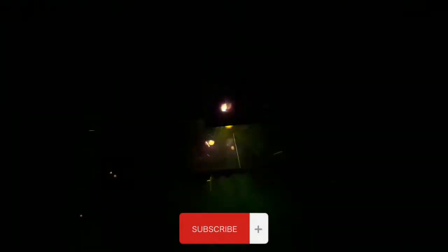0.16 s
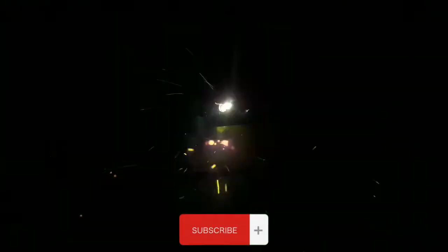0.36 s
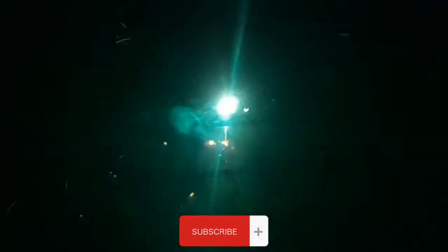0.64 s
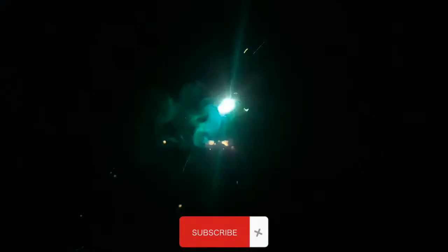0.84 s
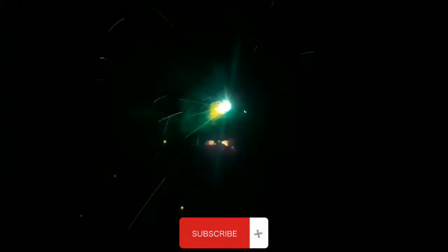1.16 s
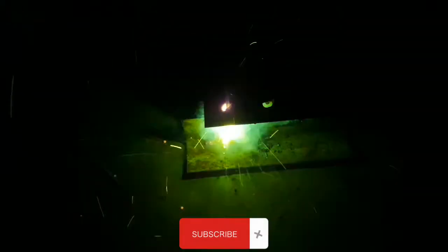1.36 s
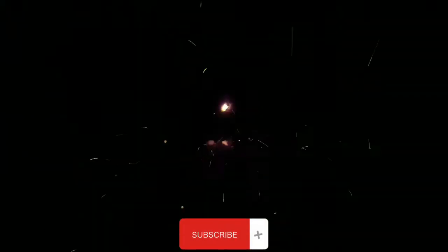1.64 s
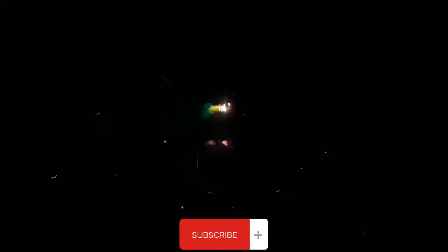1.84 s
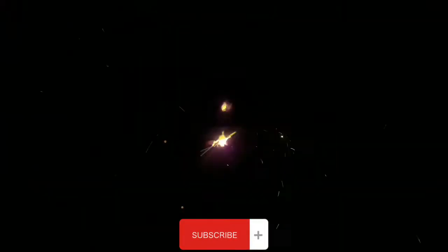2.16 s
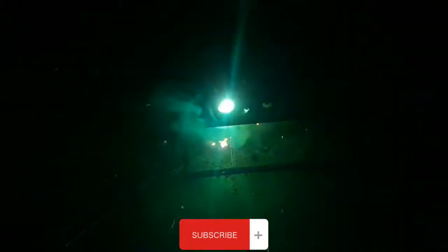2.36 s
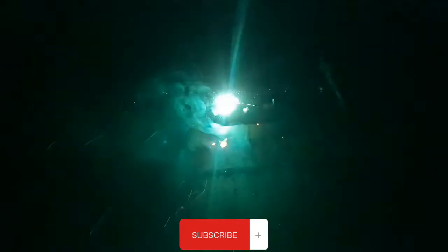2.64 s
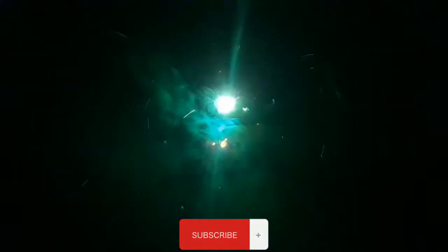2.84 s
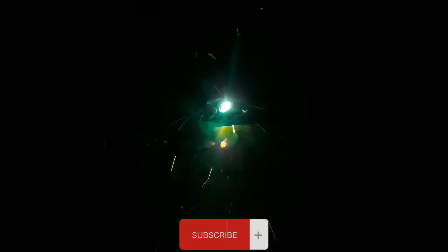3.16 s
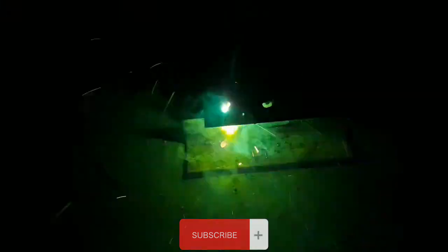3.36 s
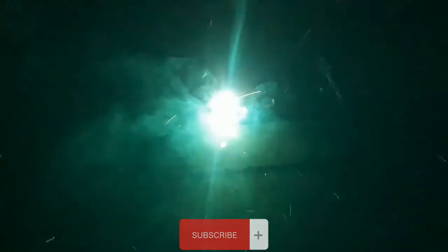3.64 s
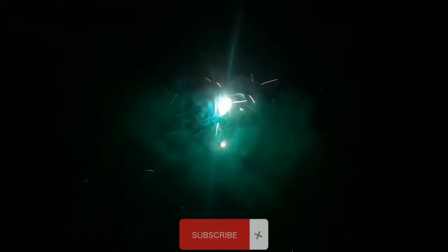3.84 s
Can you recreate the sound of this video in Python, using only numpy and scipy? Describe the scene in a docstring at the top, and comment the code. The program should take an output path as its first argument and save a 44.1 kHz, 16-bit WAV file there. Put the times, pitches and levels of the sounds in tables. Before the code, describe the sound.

An electric welding arc hisses and crackles on steel, cutting out twice and restriking with pops

```python
"""A mains-fed welding arc burns on steel close to a microphone in a workshop, over a transformer that hums with load.
From the start the arc hisses and roars, often in puffs twice per mains cycle; droplets snap off as ringing clicks
with a short fizz, and blunt pops burst out. At about 1.5 s and 2 s the arc dies and soon restrikes.
It then burns on with more snaps and pops, and near 3.7 s a low drone swells. Echo and soft shop noise surround it."""
import sys
import numpy as np
from scipy import signal
from scipy.fft import rfft, irfft
from scipy.io import wavfile
from scipy.ndimage import uniform_filter1d

SR = 44100
rng = np.random.default_rng(int(sys.argv[2]) if len(sys.argv) > 2 else 0)


def magnitude_from_level(level_db):
    """Linear magnitude for a level in decibels (20 dB per decade)."""
    exponent = np.asarray(level_db, float) / 20
    return 10 ** exponent


def dump(signal):
    """Clip the signal to [-1, 1] and save it as 16-bit WAV at the path in sys.argv[1]."""
    limited = np.clip(np.atleast_2d(signal).T, -1, 1)
    pcm = np.round(limited * 32767).astype(np.int16)
    wavfile.write(sys.argv[1], SR, pcm)


N = 176400

# tone colour of the sizzle: (frequency [Hz], level per Hz [dB])
SIZZLE_COLOUR = [(710, -52), (1200, -3), (1430, -16), (1730, -15.5), (1890, -6.5), (2300, -17.5),
                 (2590, -14.5), (3430, -7.5), (3700, -4), (5130, -0.5), (5780, -5), (8600, 0), (9800, -8.5),
                 (14800, -2.5), (16000, -3.5)]
# twice the mains rate, and the time of one current peak
PULSE_HZ, PULSE_PEAK_S = 100.25, .0065


def colour(x, table):
    """Filter by (Hz, dB) points, then scale to an rms of 1."""
    f, db = np.array(table).T
    hz = np.arange(N // 2 + 1) * SR / N + 1
    gain_db = np.interp(np.log(hz), np.log(f), db, left=-80, right=-80)
    y = irfft(rfft(x) * magnitude_from_level(gain_db), N)
    return y / np.std(y)


def curve(table, col):
    """One table column joined by straight lines in time."""
    table = np.array(table)
    return np.interp(np.arange(N) / SR, table[:, 0], table[:, col])


def walk(rate):
    """Random levels, each held for 1 / rate seconds, with softened steps."""
    k = int(SR / rate)
    steps = np.repeat(rng.standard_normal(N // k + 1), k)
    return uniform_filter1d(steps, k // 2 + 1)[:N]


def add(out, x, t):
    """Mix x into out from time t in seconds."""
    i = int(round(t * SR))
    out[i:i + len(x)] += x[:len(out) - i]


def shop_noise():
    """Workshop background: steady coloured noise whose level drifts gently."""
    # (frequency [Hz], level per Hz [dB])
    shop_colour = [(30, -26), (80, -12), (140, 1.5), (270, -0.5), (500, -6.5), (1000, -15), (2000, -13.5),
                   (8300, -40), (10000, -47), (15500, -31)]
    level = magnitude_from_level(-48.5 + 1.5 * walk(6))
    return level * colour(rng.standard_normal(N), shop_colour)


def hum():
    """The transformer buzzes with load and wavers; mains hum and a low drone stay on."""
    # buzz tones: (multiple of the pulse rate, relative level [dB])
    harmonics = [(1, -2.5), (2, -4), (3, -6)]
    # transformer load: (time [s], hum level [dB])
    load = [(0, -46), (.17, -43), (.32, -45), (.45, -42), (.8, -47.5), (1.15, -50), (1.22, -41),
            (1.47, -43.5), (1.52, -56), (1.85, -50), (1.92, -52), (1.98, -43), (2.02, -74), (2.17, -56),
            (2.22, -45.5), (2.45, -50), (3.15, -57), (3.3, -45), (3.65, -50.5), (3.8, -47), (4, -56)]
    # low drone: (time [s], level [dB])
    drone = [(0, -54), (1.5, -60), (3.6, -57), (3.72, -44), (3.8, -42), (4, -43)]
    mains_db, drone_hz = -61, 139
    t = np.arange(N) / SR

    def tone(hz, db, waver_db):
        """A sine whose level and phase both wander."""
        level = 2 ** .5 * magnitude_from_level(db + waver_db * walk(21.9))
        return level * np.sin(2 * np.pi * hz * t + 1.2 * walk(12))

    buzz = sum(tone(k * PULSE_HZ, db + curve(load, 1), 2.5) for k, db in harmonics)
    mains = tone(PULSE_HZ / 2, mains_db, 1.5)
    return buzz + mains + tone(drone_hz, curve(drone, 1), 1.8)


def room(x):
    """Diffuse workshop echo: bands of noise, each fading at its own rate."""
    # (band centre [Hz], time to fade by 60 dB [s], level [dB])
    echo_bands = [(252, 0.81, -30), (940, 1, -6), (2770, 0.74, -8), (7400, 0.59, -8.5), (14000, 0.87, -30)]
    t, tail = np.arange(SR) / SR, 0
    for hz, t60, db in echo_bands:
        edges = [hz / 2, min(hz * 1.66, 18000)]
        sos = signal.butter(2, edges, "band", fs=SR, output="sos")
        band = signal.sosfilt(sos, rng.standard_normal(SR))
        fade = magnitude_from_level(db - 60 * t / t60) * np.sqrt(14 / t60 / SR)
        tail = tail + fade * band * np.clip(t / 0.0033, 0, 1)  # builds up over 3.3 ms
    return signal.fftconvolve(x, tail)[:N]


def plate(x):
    """The steel workpiece rings faintly with whatever strikes it."""
    # ringing tones of the steel: (frequency [Hz], relative level [dB])
    modes = [(3500, -6), (4400, 0), (4900, -3), (5250, -4), (7250, -4), (7950, -2), (8230, 0), (8400, 0),
             (8750, -2), (13960, -4), (14720, -4)]
    ring_db, t60_s = -16, .07
    t = np.arange(SR // 4) / SR
    ring = sum(magnitude_from_level(db - 60 * t / t60_s) * np.sin(2 * np.pi * hz * t) for hz, db in modes)
    ring = ring / np.sqrt(np.sum(ring ** 2))
    return magnitude_from_level(ring_db) * signal.fftconvolve(x, ring)[:N]


def mic_ring(x, ring=1):
    """The microphone port rings briefly at two treble pitches."""
    x = np.append(x, np.zeros(90))
    lower = signal.lfilter(*signal.iirpeak(8400, 6, fs=SR), x)
    upper = signal.lfilter(*signal.iirpeak(14000, 6, fs=SR), x)
    return x + ring * (.5 * lower + .4 * upper)


def blast(ms):
    """Pressure builds, drops abruptly below rest and recovers: one N-shaped cycle."""
    u = np.arange(-12, 60) / SR * 1000 / ms  # time counted in pulse widths
    rise = np.exp(-(2 * u + .5) ** 2)
    recovery = -.8 * np.exp(-u / .9) * np.tanh(8 * u)
    return np.where(u < 0, rise, recovery)


def whistles():
    """Narrow, fluttering bands of hiss that swell and fade."""
    # (start [s], length [s], frequency [Hz], level [dB])
    whistle_list = [(1.158, .05, 3950, -38), (1.175, .05, 2400, -38), (1.222, .055, 2800, -41.5),
                    (1.405, 0.035, 4920, -34.5), (1.877, 0.13, 4300, -44), (3.13, 0.13, 3960, -50),
                    (3.232, 0.35, 4480, -47.5)]
    width_hz = 130
    out = np.zeros(N)
    for s, length, hz, db in whistle_list:
        narrow = signal.iirpeak(hz, hz / width_hz, fs=SR)
        band = signal.lfilter(*narrow, rng.standard_normal(N))[-int(length * SR):]
        swell = signal.windows.tukey(len(band), .5)
        add(out, magnitude_from_level(db) * band / np.std(band) * swell, s)
    return out * magnitude_from_level(1.0 * walk(60))


def pops(fizz):
    """A wider blast, a sudden pressure drop that the microphone's low cut rings out, and a short fizz."""
    # pops as the arc restrikes or bursts: (time [s], pulse level [dB], pulse width [ms], thump level [dB])
    pop_list = [(.6569, -2, .2, -13), (.9832, -5, .14, -24), (1.0620, -1, .16, -13), (1.1352, -5, .1, -34),
                (1.7920, -2, .07, -17), (1.7925, 0, .13, -12), (1.8115, -3, .1, -13), (1.8121, 0, .17, -9),
                (1.8146, -11, .07, -30), (1.8226, -14, .18, -30), (1.8261, -9, .18, -24),
                (1.8621, -12, .14, -32), (2.3873, -3, .1, -3), (2.4113, -9, .14, -26),
                (3.0710, -9, .12, -12), (3.4581, -11, .16, -28), (3.4666, -11, .12, -30)]
    low_cut_hz, fizz_db = 100, -30  # fizz is relative to the pulse
    out, tail = np.zeros(N), np.zeros(N)
    low_cut = signal.butter(3, low_cut_hz, "high", fs=SR, output="sos")
    drop = -signal.sosfilt(low_cut, np.ones(3000))
    fade = np.exp(-np.arange(3000) / SR / 0.002)
    for s, db, ms, thump_db in pop_list:
        peak_s = s + ms / 4000
        add(out, magnitude_from_level(db) * mic_ring(blast(ms)), peak_s - 12 / SR)  # blast drops at its 12th sample
        add(out, magnitude_from_level(thump_db) * drop, peak_s)
        add(tail, magnitude_from_level(db + fizz_db) * fade, s)
    return out + tail * fizz


def snaps(fizz, throb):
    """Bright ringing clicks; bursts add a fizz that dies in a few ms and a flare that sinks back more slowly."""
    # droplet snaps: (time [s], peak level [dB])
    snap_list = [(.1429, -21), (.1475, -16), (.1758, -12), (.1769, -14), (.2676, -13), (.2715, -14),
                 (.2954, -4), (.2963, -6), (.2973, -4), (.3651, -19), (.4055, -13), (.427, -14),
                 (.4641, -16), (.4944, 0), (.4961, -14), (.4973, -14), (.6586, -11), (.66, -12),
                 (.7253, -1), (.7451, -13), (.7649, -9), (.8233, -17), (.8741, -7), (.8759, -14),
                 (.8925, -12), (.9883, -14), (.995, -11), (1.0254, -8), (1.0333, -5), (1.0395, -13),
                 (1.053, -10), (1.0549, -12), (1.057, -11), (1.1112, -5), (1.1141, -13), (1.1158, -11),
                 (1.1349, -9), (1.1524, -5), (1.1848, -13), (1.1904, -13), (1.2742, -16), (1.3553, -16),
                 (1.4336, -15), (1.4728, -15), (1.4741, -18), (1.7125, -27), (1.8638, -7), (1.8659, -16),
                 (1.9299, -9), (1.9315, -10), (1.9331, -14), (2.2915, -17), (2.2925, -10), (2.3023, -9),
                 (2.3302, -21), (2.3488, -18), (2.3505, -18), (2.3611, -18), (2.4522, -17), (2.4796, -18),
                 (2.5004, -13), (2.5093, -20), (2.5224, -14), (2.5274, -16), (2.5288, -15), (2.6093, -20),
                 (2.6277, -16), (2.6295, -18), (2.6815, -16), (2.6894, -20), (2.7003, -9), (2.732, -19),
                 (2.789, -21), (2.8008, -16), (2.8461, -10), (2.8596, -19), (2.9267, -14), (2.9288, -18),
                 (2.9322, -18), (2.9379, -6), (3.0151, -15), (3.0871, -19), (3.1002, -17), (3.1014, -16),
                 (3.1057, -16), (3.1462, -15), (3.1791, -16), (3.1815, -16), (3.2256, -14), (3.2272, -13),
                 (3.4194, -20), (3.4549, -14), (3.4778, -14), (3.6873, -5), (3.6896, -15), (3.7573, -15),
                 (3.868, -12), (3.9074, -13), (3.9144, -5)]
    # bursts of the arc: (time [s], fizz level [dB], flare level [dB])
    bursts = [(.175, -20, -38), (.265, -26, -50), (.2954, -14, -36), (.405, -36, -32), (.4946, -19, -26),
              (.633, -32, -36), (.6572, -17, -21), (.7253, -18, -45), (.874, -19, -25), (.8926, -24, -42),
              (.9835, -35, -26.5), (1.0333, -24, -29.5), (1.053, -25, -37), (1.1115, -18, -32),
              (1.1351, -26, -32), (1.353, -26, -38), (1.412, -25, -45), (1.472, -25, -45),
              (1.841, -30, -43), (1.862, -21, -35), (1.93, -18, -33), (2.209, -30, -40), (2.291, -26, -45),
              (2.3023, -23, -43), (2.349, -28, -45), (2.627, -26, -39), (2.8, -36, -35), (2.926, -27, -45),
              (2.938, -21, -36), (3.0995, -24, -42), (3.146, -26, -39), (3.2256, -22, -37),
              (3.455, -28, -36), (3.6875, -21, -28), (3.868, -26, -30), (3.9072, -27, -45),
              (3.9146, -24, -28)]
    base_width_ms, snap_fizz_db = .065, -19.5  # fizz is relative to the snap
    fizz_ms, flare_ms = 1.26, 23.4  # decay times to 37 %
    out, tail, flare = np.zeros(N), np.zeros(N), np.zeros(N)
    t = np.arange(8000) / SR * 1000  # ms
    puff = np.exp(-t / fizz_ms) * np.tanh(t / .4)
    for (s, db), luck in zip(snap_list, rng.random(len(snap_list))):
        # louder snaps are wider, with some chance in each
        width_ms = base_width_ms * (.65 + .5 * luck + .25 * magnitude_from_level(db))
        click = mic_ring(blast(width_ms), ring=4)
        peak = np.abs(click).argmax()
        add(out, magnitude_from_level(db) * click / np.abs(click).max(), s - peak / SR)
        add(tail, magnitude_from_level(db + snap_fizz_db) * puff, s)
    for s, fizz_db, flare_db in bursts:
        add(tail, magnitude_from_level(fizz_db) * puff, s)
        add(flare, magnitude_from_level(flare_db) * np.exp(-t / flare_ms), s)
    return out + (tail + flare * throb) * fizz


def arc():
    """Hiss that puffs on each current peak, every puff its own size, with sparks, sudden spits and a lower roar."""
    # (time [s], sizzle level [dB], brightness above about 9 kHz [dB], roar level [dB], pulsing depth [0-1])
    burning = [(0, -30.5, -7, -33, 0.1), (.135, -48, -3, -39.5, 0.95), (.15, -25.5, -6, -29.5, 0.53),
               (.3, -35, 0, -38, 0), (.45, -32, -5, -37.5, 0.57), (.62, -32.5, -8, -36.5, 0.2),
               (.72, -27.5, -3, -39.5, 0), (.85, -35, -1, -39, 0), (.97, -36, 5, -35.5, 0.45),
               (1.04, -32, 5.5, -38, 0.2), (1.14, -34, 8, -44, 0.84), (1.2, -31.5, -2.5, -33, 0.67),
               (1.37, -38.5, -11, -36.5, 0.65), (1.43, -32.5, 0, -33, 0.35), (1.485, -31, -7, -40.5, 0.4),
               (1.5, -59, 10, -42.5, 0.36), (1.706, -81, 6, -77, 0.9), (1.709, -41.5, 5, -47, 0.08),
               (1.79, -38, 5, -56, 0.34), (1.88, -41.5, 8, -39, 1), (1.965, -34, -3, -33.5, 0.2),
               (1.98, -57, 7, -52, 0.4), (2.176, -59, -4, -68, .5), (2.179, -45, -1, -41, 0.3),
               (2.28, -39, -2, -39.5, 0.2), (2.36, -35, 4, -48, 0), (2.52, -34.5, -2.5, -44, 0.5),
               (2.72, -39.5, -0.5, -48, 0.65), (2.92, -36.5, 1.5, -48, 0), (3.05, -38.5, 2, -48, 0.1),
               (3.2, -42, 8, -41.5, 0.84), (3.37, -39.5, -5, -39.5, 0.3), (3.47, -38, 2, -40.5, 0.7),
               (3.66, -36.5, -12, -40.5, 0.48), (3.74, -31.5, -4.5, -40.5, 0.02),
               (3.85, -38.5, -4, -40, 0.27), (3.92, -27, -3, -35.5, 0), (4, -37.5, 0, -39, 0.04)]
    # tone colour of the roar: (frequency [Hz], level per Hz [dB])
    roar_colour = [(60, -7), (100, -4.5), (200, -3.5), (400, -6.5), (800, -7.5), (1200, -12), (1800, -12.5),
                   (3000, -12.5), (5000, -19)]
    puff_sharpness, puff_db = 2.1, 4
    sparks_per_s, spark_db, spark_spread_db = 1700, 11.5, 2  # rates follow or levels scale with the puffs
    spits_per_s, spit_db, spit_spread_db, spit_ms = 180, 3.5, 0.5, 2.9  # tiny bursts inside the hiss
    phase = (np.arange(N) / SR - PULSE_PEAK_S) * PULSE_HZ
    puff_sizes = magnitude_from_level(puff_db * np.tanh(rng.standard_normal(500)))
    size = puff_sizes[np.floor(phase + 1.5).astype(int)]
    depth = np.clip(curve(burning, 4), 0, 1)
    pulse = np.abs(np.cos(np.pi * phase)) ** puff_sharpness
    puffs = 1 - depth + 2 * depth * size * pulse

    # sparks and spits start by chance, a few much louder than the rest
    luck = rng.random((N, 4)).T
    spark_size = magnitude_from_level(spark_db - spark_spread_db * np.log(luck[1] + 0.0045))
    sparks = (luck[0] < sparks_per_s / SR) * spark_size * puffs
    spit_size = magnitude_from_level(spit_db - spit_spread_db * np.log(luck[3] + 0.06))
    starts = (luck[2] < puffs * spits_per_s / SR) * spit_size
    spits = signal.lfilter([1], [1, -np.exp(-1000 / SR / spit_ms)], starts)

    hiss_level = puffs * magnitude_from_level(2.0 * walk(500)) + spits
    hiss = colour(rng.standard_normal(N) * hiss_level + sparks + 2.0 * starts, SIZZLE_COLOUR)
    treble = signal.sosfiltfilt(signal.butter(4, 9500, "high", fs=SR, output="sos"), hiss)
    hiss = hiss + (magnitude_from_level(curve(burning, 2)) - 1) * treble
    roar_level = (puffs + 0.35) * magnitude_from_level(2.1 * walk(30))
    roar = colour(rng.standard_normal(N) * roar_level, roar_colour)
    return magnitude_from_level(curve(burning, 1)) * hiss + magnitude_from_level(curve(burning, 3)) * roar


def scene():
    """Arc, snaps and whistles with plate ring and echo, close pops with less echo, over hum and workshop noise."""
    pop_echo_db = -12
    fizz = colour(rng.standard_normal(N) * magnitude_from_level(3 * walk(900)), SIZZLE_COLOUR)
    throb = 1 + 0.13 * np.cos(2 * np.pi * (np.arange(N) / SR - PULSE_PEAK_S) * PULSE_HZ)
    near = arc() + snaps(fizz, throb) + whistles()
    close = pops(fizz)
    near = near + plate(near)
    echo = room(near + magnitude_from_level(pop_echo_db) * close)
    return (near + close + echo + hum() + shop_noise())[None]


def roll_off(x):
    """The treble ends steeply here."""
    return signal.sosfilt(signal.butter(12, 16810, fs=SR, output="sos"), x)


def record(dry):
    """The loudest peaks round off below a ceiling and the top treble is cut."""
    ceiling, top_hz = 1.0, 15700
    soft = dry / (1 + np.abs(dry / ceiling) ** 4) ** .25
    # the filter runs forwards and backwards, so its ripple and cut in dB double
    top_cut = signal.ellip(8, .2, 14, top_hz, fs=SR, output="sos")
    mix = signal.sosfiltfilt(top_cut, soft)
    return roll_off(mix)


dry = scene()
out = record(dry)
dump(out)
```